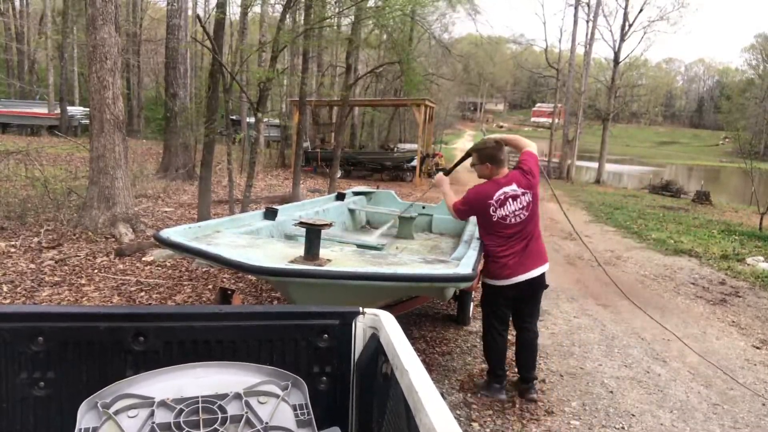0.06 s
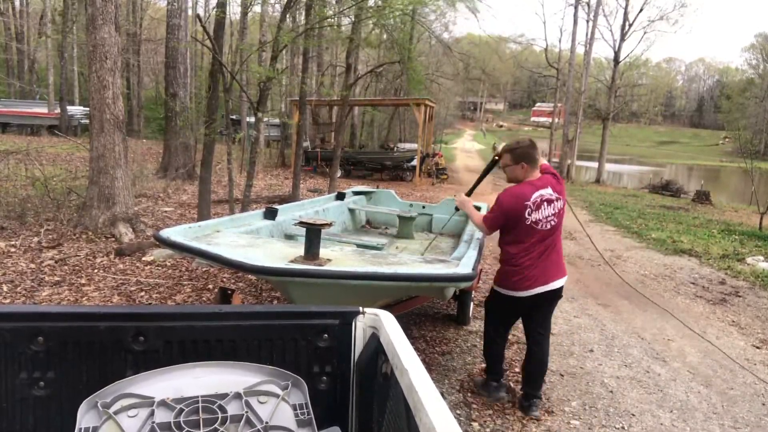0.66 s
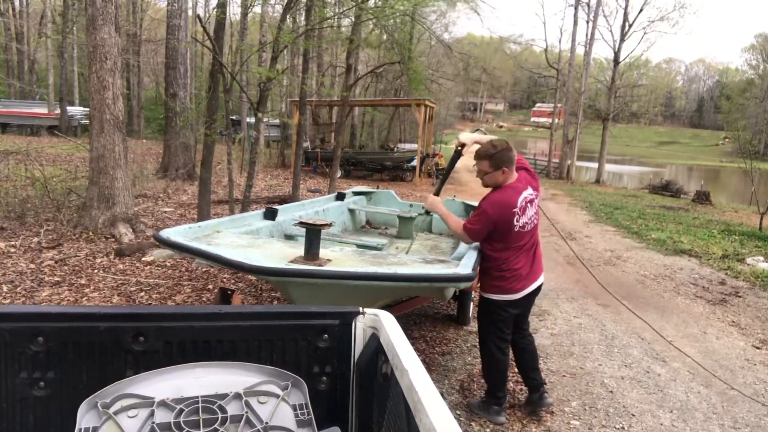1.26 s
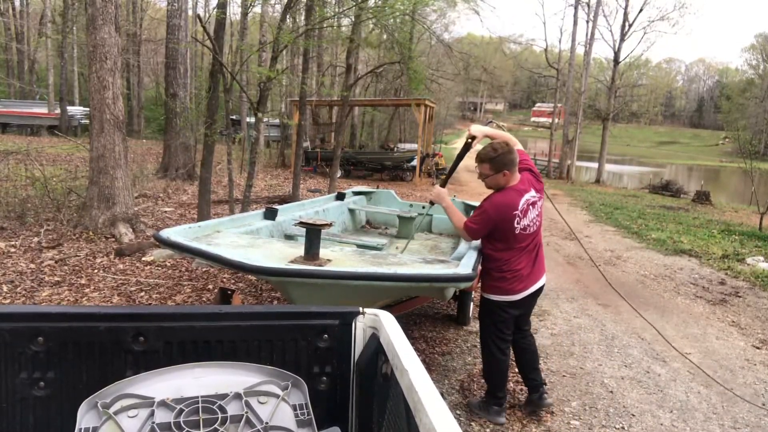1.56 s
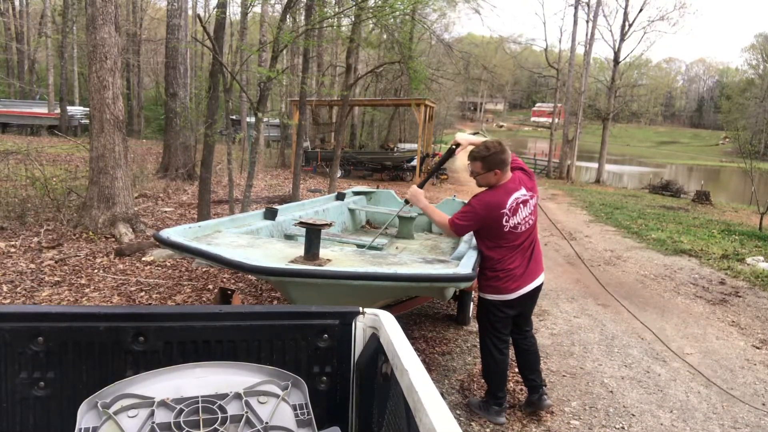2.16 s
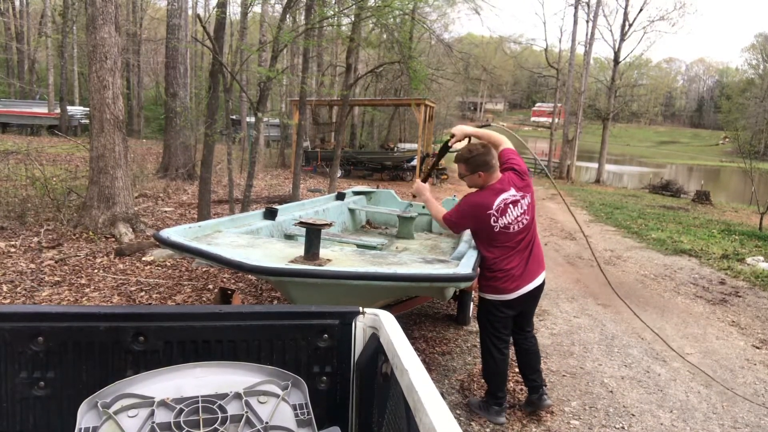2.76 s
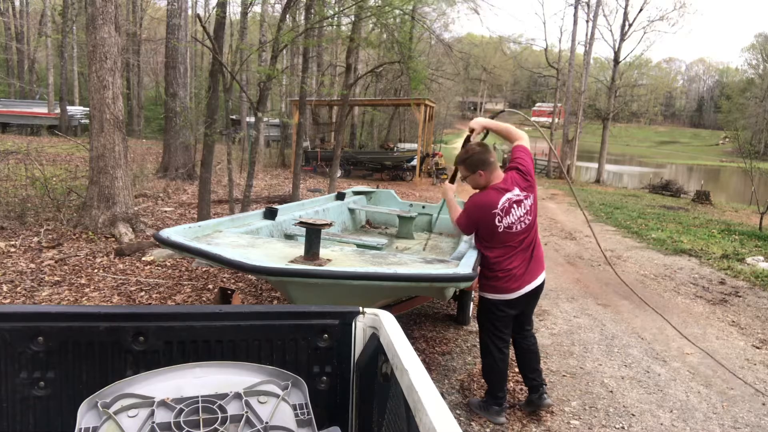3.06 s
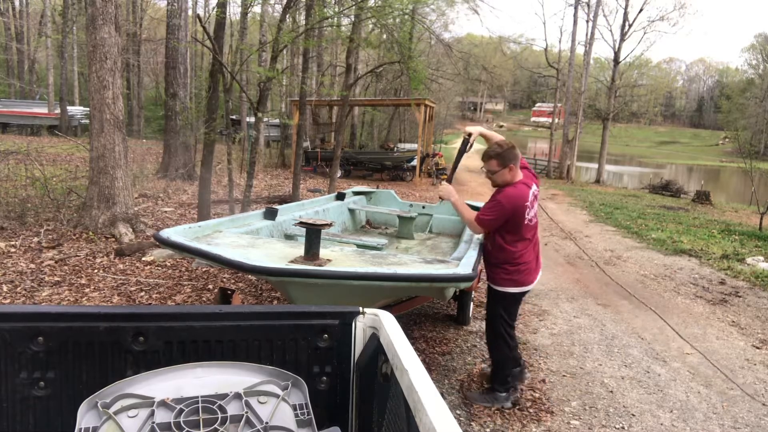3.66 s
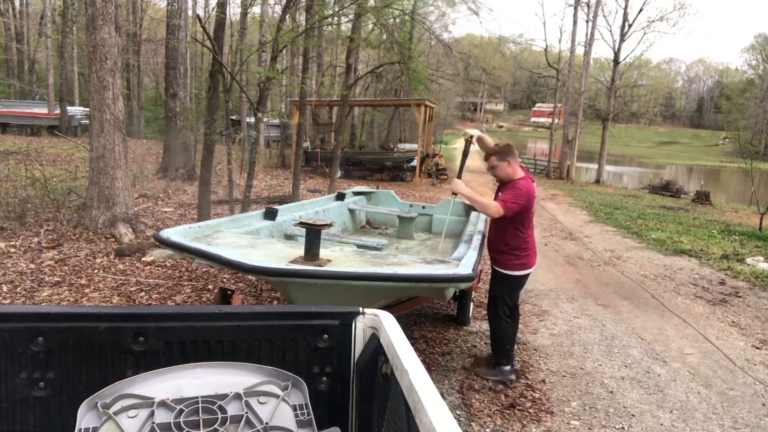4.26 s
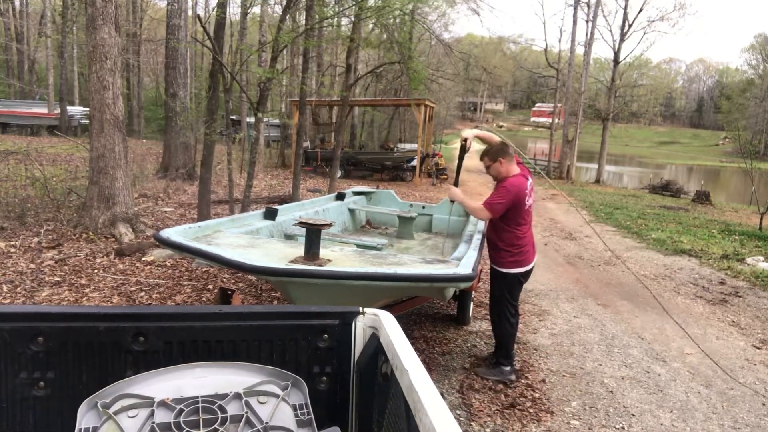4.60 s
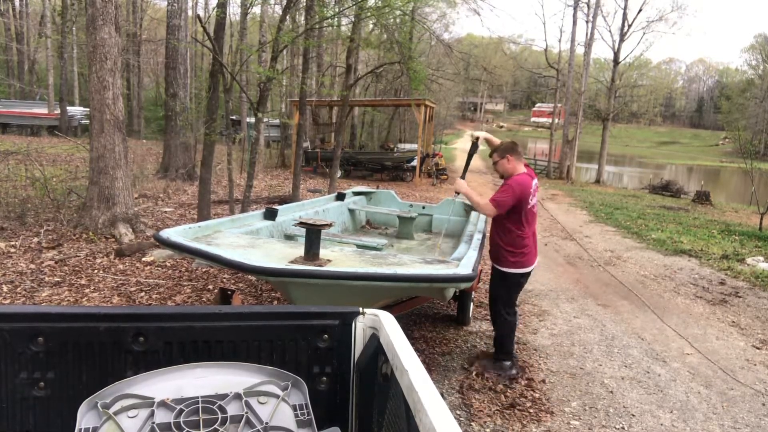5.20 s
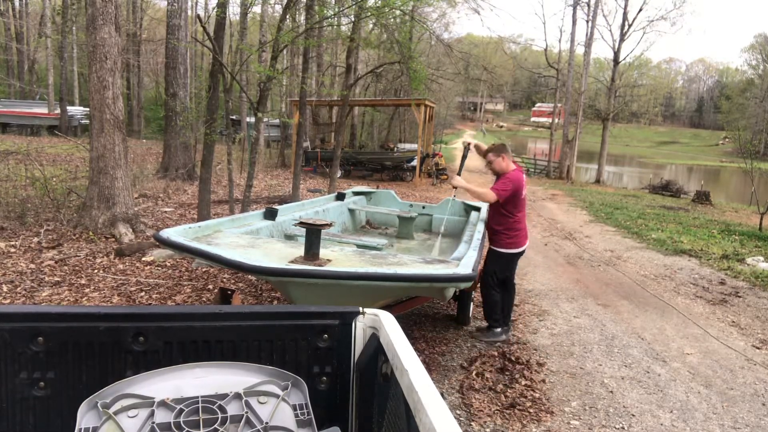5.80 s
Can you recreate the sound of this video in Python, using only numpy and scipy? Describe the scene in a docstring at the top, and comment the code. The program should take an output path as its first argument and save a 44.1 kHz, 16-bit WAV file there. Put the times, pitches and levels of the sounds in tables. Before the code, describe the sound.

An electric pressure washer runs outdoors with a buzzing hum and a thin high whine. At first the pump races unevenly and the nozzle spits air, while lumps of water slap a fiberglass boat. Then the pump slows slightly and holds steady, and the jet becomes a stronger, bright hiss with drops pattering on the hull. Light gusts of wind bump the single microphone.

```python
"""An electric pressure washer hums and hisses as it rinses a fiberglass boat outdoors.
Its pump knocks once per stroke, so fast that the knocks blend into a hum. With air in its water it
first races and spits, then slows and runs steadily at full pressure.
The jet is a hiss of tiny drops; heavier drops patter and drum on the hull.
Behind it all, light gusts of wind bump against the single microphone."""
import sys
import numpy as np
from scipy import signal
from scipy.fft import rfft, irfft, next_fast_len
from scipy.io import wavfile

SR = 44100
rng = np.random.default_rng(int(sys.argv[2]) if len(sys.argv) > 2 else 0)


def wav_record(signal):
    """Record a signal, one row per channel, as 16-bit PCM in the file named by sys.argv[1]."""
    frames = np.transpose(np.atleast_2d(signal))
    bounded = np.clip(frames, -1, 1)
    # unit amplitude maps onto the largest positive 16-bit level
    quanta = np.round(bounded * 32767).astype(np.int16)
    wavfile.write(sys.argv[1], SR, quanta)


N = 266364


# The tones in the hum: multiple of the stroke rate, relative level/dB running light, and working hard
HUM_TONES = [(1, -41, -33), (2, -12.5, -4), (3, -19, -11), (4, -18, -15), (5, -6, -7.3), (6, -6.5, -9),
             (7, -17, -11.8), (8, -9.5, -11.5), (9, -5, -8), (10, -9, -4), (11, -24, -29), (12, -20, -13.3),
             (13, -23, -13.3), (14, -27, -16), (15, -29, -11), (16, -26, -17.5), (17, -29, -29),
             (18, -28, -16), (19, -25, -29)]

def pump_hum(angle, pressure, phase_spread=1.0, waver_db=-0.13, waver_per_order_db=0.092, load_curve=1.7):
    """One knock per stroke makes a hum; hard work brings up its low tones and its buzzy top."""
    out, load = np.zeros(N), pressure ** load_curve
    for order, light_db, loaded_db in HUM_TONES:
        gain = (1 - load) * from_db(light_db) + load * from_db(loaded_db)
        waver = from_db((waver_db + waver_per_order_db * order) * drift(7.9))
        out += gain * waver * np.sin(order * angle + phase_spread * rng.standard_normal())
    return np.sqrt(2) * from_db(hum_db(pressure)) * out


# How many strokes the pump makes each second: t/s, f/Hz
STROKE_RATE = [(0.11, 112.7), (0.12, 111.5), (0.21, 115.8), (0.29, 111.5), (0.34, 115.7), (0.51, 113.4),
               (0.74, 113.9), (0.77, 111.9), (0.82, 113.1), (0.85, 110.0), (0.89, 110.9), (1.0, 109.9),
               (1.07, 116.2), (1.15, 116.2), (1.25, 112.2), (1.3, 113.5), (1.36, 110.8), (1.88, 109.0),
               (2.77, 109.2), (6.04, 109.0)]

def pump_angle(wander_hz=0.099, sway_hz=0.21, sway_rate_hz=5.6):
    """How far the pump has turned, one circle per stroke; its speed wanders and sways a little."""
    sway = np.sin(2 * np.pi * sway_rate_hz * np.arange(N) / SR + 1.56 * drift(0.98))
    speed = in_time(STROKE_RATE) + wander_hz * drift(4.87) + sway_hz * sway
    return 2 * np.pi * np.cumsum(speed) / SR


def hum_db(pressure, light_db=-30.5, loaded_db=-31, db_per_hz=0.98, light_speed_hz=113.5):
    """Running light, the hum gets louder with speed; working hard, it stays even."""
    racing_db = light_db + db_per_hz * (in_time(STROKE_RATE) - light_speed_hz)
    return by_pressure(pressure, racing_db, loaded_db)


# How hard the pump pushes the water: t/s, share of full pressure (0 to 1)
WATER_PRESSURE = [(0, 0.54), (.2, 0.16), (1.1, 0.12), (1.25, 0.1), (1.45, 0.74), (1.8, 1.0), (6.04, 0.99)]

def water_pressure():
    """The pressure sags while the pump draws air, then climbs to full."""
    return np.clip(in_time(WATER_PRESSURE), 0, 1)


# Gear and motor tones: multiple of the stroke rate (played rounded), level/dB running light, working hard
WHINE_TONES = [(23, -65, -61), (24, -56, -61.5), (30, -75, -55), (34, -75, -53), (35, -60, -59),
               (38, -63, -53), (40, -61, -48.5), (42, -46.5, -61.5), (43, -67, -58), (44, -66, -49),
               (45, -67, -57), (47, -62, -76), (48, -45, -73), (49, -42, -66), (54, -53, -46),
               (58, -50, -59), (61, -61, -48.5), (65.7, -56, -52), (68.5, -65, -47.5), (86, -70, -57),
               (103.6, -66, -47)]

def gear_whine(angle, pressure, flutter_db=2.5, slip=0.43):
    """Thin, high tones flutter as the gear teeth meet, and change level with the pressure."""
    out = np.zeros(N)
    for order, light_db, loaded_db in WHINE_TONES:
        phase = round(order) * angle + rng.uniform(0, 2 * np.pi) + slip * drift(11.5)
        level_db = by_pressure(pressure, light_db, loaded_db) + flutter_db * drift(16)
        out += from_db(level_db) * np.cos(phase)
    return np.sqrt(2) * out


# Moments when the pump's tones briefly drop in level: t/s, length/s, dip/dB
HUM_DIPS = [(0.478, 0.058, 5), (0.83, 0.1, 2), (0.942, 0.08, 10)]

def pump_dips_db(hold_s=0.013, fall_s=0.029):
    """The pump's tones dip briefly a few times early on, and during most bumps of wind."""
    dips = sum(db * burst_shape(start, length, 0.023, 0.018) for start, length, db in HUM_DIPS)
    bumps = sum(db * burst_shape(start, hold_s, fall_s=fall_s) for start, _, db in WIND_BUMPS)
    return dips + bumps


# The notes the pump's case rings at: f/Hz, width/Hz, level/dB running light, level/dB working hard
CASE_NOTES = [(2236, 56, -53, -49), (4850, 130, -51, -66), (5570, 85, -51, -45.5), (5844, 100, -52, -45),
              (7390, 130, -47.5, -50)]

def case_ring(angle, pressure, rub=1.0, flutter_db=2.5):
    """A tick in each stroke and steady rubbing make the pump's case ring."""
    ticks = np.diff(np.floor(angle / (2 * np.pi)), prepend=0)
    drive = rms_one(ticks) + rub * rng.standard_normal(N)
    out = np.zeros(N)
    for hz, width, light_db, loaded_db in CASE_NOTES:
        level_db = by_pressure(pressure, light_db, loaded_db) + flutter_db * drift(29)
        out += from_db(level_db) * rms_one(resonate(resonate(drive, hz, width), hz, 10 * width))
    return out


def case_song(angle, pressure, centre_hz=2298, width_hz=44, light_db=-38.5, loaded_db=-42.0):
    """A pump tone sings out when it nears the case's clearest note, less evenly while running light."""
    speed, out = np.gradient(angle) * SR / (2 * np.pi), np.zeros(N)
    nearest = round(centre_hz / speed.mean())
    for order in range(nearest - 2, nearest + 2):
        gain = 1 / (1 + (2 * (order * speed - centre_hz) / width_hz) ** 2)
        out += gain * np.cos(order * angle + 0.15 * drift(15))
    flutter_db = by_pressure(pressure, weak_db=3.5, full_db=2.0) * drift(17)
    return np.sqrt(2) * out * from_db(by_pressure(pressure, light_db, loaded_db) + flutter_db)


# The tone colour of the jet, weak and at full pressure: f/Hz, relative level/dB
WEAK_JET_COLOUR = [(1500, -3.5), (3000, -6.5), (3900, -7), (4600, -1.5), (6000, 0.5), (7300, -1),
                   (8300, -3), (11500, -2.5), (13500, -6), (15700, -10.5)]
FULL_JET_COLOUR = [(1500, -25), (3000, -14), (3700, -7), (4400, -1.5), (5200, -5), (5900, 2), (6900, -4),
                   (7500, -2.5), (8100, -4), (9500, -3), (11300, -2.5), (13200, -3.5), (14500, -8.5),
                   (15700, -7.5)]

def jet(angle, pressure, stroke_ripple=0.19, valve_ripple=0.16, flutter_db=0.28, growth_db_per_s=0.31):
    """Fine mist hisses, louder and brighter with pressure, and pulses with the strokes and valves."""
    weak = coloured(droplets(per_s=30000, spread_db=-1.0), WEAK_JET_COLOUR)
    full = coloured(droplets(per_s=30000, spread_db=1.5), FULL_JET_COLOUR)
    spray = np.sqrt(1 - pressure) * weak + np.sqrt(pressure) * full
    ripple = 1 + stroke_ripple * np.cos(angle) + valve_ripple * np.cos(4 * angle)
    level_db = by_pressure(pressure, weak_db=-35, full_db=-30.5) + growth_db_per_s * np.arange(N) / SR
    level_db += 0.31 * sweep_db()  # the hiss swells less than the splash
    return high_pass(spray, 1320) * ripple * from_db(level_db + flutter_db * drift(19))


# Air pockets leaving the nozzle: t/s, length/s, hiss level/dB, splash level/dB, sizzle level/dB
AIR_POCKETS = [(0.0, 0.017, -27, -48, -34), (.847, 0.013, -28, -41, -40), (0.881, 0.049, -26, -38.5, -30.5),
               (0.938, 0.1, -30.5, -37, -48), (1.531, 0.037, -21, -28.5, -40),
               (1.575, 0.016, -25, -32, -42), (1.61, .025, -27, -35, -45),
               (1.648, 0.027, -22.5, -31.5, -40), (1.973, 0.022, -20.5, -32, -38),
               (2.01, .055, -29, -39, -42)]
# The tone colour of their hiss: f/Hz, relative level/dB
SPIT_COLOUR = [(2000, 8), (3200, -37), (4500, -0.5), (5900, 6), (8200, 3.5), (10500, 5), (13200, 4),
               (15700, 9.5)]

def spits(sizzle_hz=13200, sizzle_width_hz=3000):
    """Each air pocket bursts out with a hiss and a high sizzle, and throws spray at the hull."""
    table = np.array(AIR_POCKETS)
    shapes = np.array([burst_shape(start, length) for start, length in table[:, :2]])
    hiss, splash, sizzle = from_db(table[:, 2:]).T @ shapes  # three loudness curves
    burst = hiss * high_pass(coloured(rng.standard_normal(N), SPIT_COLOUR), 1740)
    spray = splash * high_pass(coloured(droplets(per_s=9000, spread_db=2.5), HULL_COLOUR), 530)
    top = resonate(rng.standard_normal(N), sizzle_hz, sizzle_width_hz)
    top = resonate(top, sizzle_hz, 2 * sizzle_width_hz)
    return (burst + spray + sizzle * rms_one(top)) * from_db(drift(60))


# The tone colour of drops hitting the hull: f/Hz, relative level/dB
HULL_COLOUR = [(90, -15), (160, -5.5), (260, -4), (420, -11), (600, -1.5), (800, -5), (1050, -3.5),
               (1500, 2.5), (1900, 1), (2400, 5.5), (3000, -2), (4400, 3.5), (5800, 3), (9000, -14)]

def hull_splash(angle, pressure, ripple=0.084, flutter_db=1.3, top_hz=7000, drone_db=-48):
    """Heavier drops patter on the hull, harder with pressure, while its main panel drones evenly."""
    drops = droplets(per_s=9000, spread_db=0.7) * (1 + ripple * np.cos(angle))
    patter = high_pass(coloured(low_pass(drops, top_hz), HULL_COLOUR), 113)
    level_db = by_pressure(pressure, weak_db=-45.5, full_db=-37) + sweep_db() + flutter_db * drift(12)
    drone = rms_one(resonate(rng.standard_normal(N), hz=1030, width=170))
    return from_db(level_db) * patter + from_db(drone_db) * drone


# The jet sweeping across the hull: t/s, swell of the splash/dB
JET_SWEEPS = [(3.97, 3.5), (5.06, 1.5), (5.44, 3), (5.59, 2.5), (5.77, 4.5), (5.94, 3)]

def sweep_db(half_length_s=0.049):
    """Each sweep of the jet is a short swell with a lull on either side."""
    swell = np.zeros(N)
    for centre, db in JET_SWEEPS:
        away = ((np.arange(N) / SR - centre) / half_length_s) ** 2
        swell += db * (1 - away) * np.exp(-away / 2)
    return swell


# Lumps of water slapping the hull: t/s, length/s, level/dB
WATER_SLAPS = [(0.037, 0.069, -29), (0.3, .015, -33), (0.486, 0.079, -37), (.675, 0.014, -31.5),
               (0.859, 0.067, -33), (0.945, 0.094, -34), (2.397, 0.066, -35), (2.526, .015, -36),
               (4.335, 0.023, -36)]
# The notes the hull's panels ring at: f/Hz, width/Hz, relative level/dB
PANEL_NOTES = [(480, 137, -4), (668, 155, 1.5), (804, 76, -4), (944, 130, -1.5), (1142, 91, -4),
               (1380, 190, -1.5)]

def hull_slaps():
    """Lumps of water set the fiberglass panels drumming."""
    force = sum(from_db(db) * burst_shape(start, length) for start, length, db in WATER_SLAPS)
    drops = droplets(per_s=4300, spread_db=4.0)
    panels = sum((-1) ** k * from_db(db) * resonate(drops, hz, width)
                 for k, (hz, width, db) in enumerate(PANEL_NOTES))
    return force * rms_one(low_pass(panels, 1800))


def boat_echoes(x, strength=0.13, count=10):
    """Very quick echoes inside the open hull colour the spray."""
    out = x.copy()
    for lag in (rng.uniform(0.001, 0.007, count) * SR).astype(int):
        out[lag:] += strength * rng.choice([-1, 1]) * x[:-lag]
    return out / np.sqrt(1 + count * strength ** 2)


# Gusts on the microphone: t/s, length/s, level/dB
WIND_GUSTS = [(0.0, 0.51, -44), (.65, 0.032, -41), (0.796, 0.24, -38.5), (1.245, .04, -39), (1.4, .02, -44),
              (2.33, 0.41, -43), (2.8, .23, -44.5), (4.13, .05, -45), (4.31, 0.25, -42.5),
              (4.95, 0.087, -47), (5.3, .13, -44), (5.68, .1, -48)]
# Single bumps of wind: t/s, level/dB, dip of the pump's tones/dB
WIND_BUMPS = [(0.038, -36, 14), (.073, -26, 4), (.25, -36, 2.5), (.42, -39, -1), (.817, -29, 1.5),
              (0.956, -36, 3), (1.024, -36, -1), (1.841, -36, 0), (2.347, -31, 3), (2.398, -33, 8),
              (2.445, -29, 7), (2.53, -35, 4.5), (2.68, -34, 1), (4.335, -29, 2), (4.44, -37, 0.5),
              (4.49, -40, 0)]
# The tone colour of the wind: f/Hz, relative level/dB
WIND_COLOUR = [(30, -43), (80, -34), (115, -13), (160, 0), (240, 5.5), (420, -0.5), (700, -4), (1050, -9.5),
               (1400, -11.5), (2200, -27), (5000, -49)]

def wind(breeze_db=-53.5, lumpy_db=6.5, thump_hz=230, thump_width_hz=130):
    """Air swirls at the microphone in uneven gusts; each bump is a low thump with a puff of noise."""
    strength = from_db(breeze_db)
    for start, length, db in WIND_GUSTS:
        gust = from_db(db) * burst_shape(start, length, rise_s=0.015, fall_s=0.073)
        strength = np.hypot(strength, gust)
    strength *= from_db(lumpy_db * np.tanh(drift(27)))
    pushes = np.zeros(N)
    for start, db, _ in WIND_BUMPS:
        puff = from_db(db) * burst_shape(start, 0.0084, rise_s=0.0029, fall_s=0.0065)
        strength = np.hypot(strength, puff)
        pushes[round(start * SR)] = from_db(db + 4)
    thumps = low_pass(resonate(pushes + 1e-18, thump_hz, thump_width_hz), 700) / 2
    return high_pass(strength * coloured(rng.standard_normal(N), WIND_COLOUR) + thumps, 130)


def outdoor_air(level_db=-74):
    """A very faint, low rush of open air."""
    colour = [(20, 1), (80, 0), (300, -12), (3000, -26)]  # f/Hz, relative level/dB
    return from_db(level_db) * coloured(rng.standard_normal(N), colour)


def by_pressure(pressure, weak_db, full_db):
    """Slide from the weak value to the full value as pressure builds."""
    return weak_db + (full_db - weak_db) * pressure


def droplets(per_s, spread_db):
    """Random tiny hits of uneven size."""
    sizes = from_db(spread_db * np.minimum(rng.exponential(1, N), 4)) * rng.standard_normal(N)
    return rms_one(sizes * (rng.random(N) < per_s / SR))


def burst_shape(start, length, rise_s=0.0048, fall_s=0.019):
    """Rise quickly, hold, then fade."""
    age = np.arange(N) / SR - start
    return np.clip(age / rise_s, 0, 1) * np.exp(-np.clip(age - length, 0, 1) / fall_s)


def drift(rate):
    """A smooth random wobble of size about 1, changing about rate times a second."""
    r = np.exp(-80 * np.pi * rate / SR)
    noise = rng.standard_normal(N // 40 + 2002)  # one value every 40 samples
    slow = signal.lfilter([1], [1, -2 * r, r * r], noise)[2000:]
    return np.interp(np.arange(N) / 40, np.arange(len(slow)), rms_one(slow))


def coloured(x, spectrum):
    """Give a sound a tone colour, at an average power of 1."""
    hz, db = np.transpose(spectrum)
    size = next_fast_len(N)
    log_hz = np.log(np.fft.rfftfreq(size, 1 / SR) + 1)
    gain = from_db(np.interp(log_hz, np.log(hz), db))
    return rms_one(irfft(rfft(x, size) * gain, size)[:N])


def resonate(x, hz, width):
    """Ring at hz; a smaller width rings longer."""
    r = np.exp(-np.pi * width / SR)
    return signal.lfilter([1, 0, -1], [1, -2 * r * np.cos(2 * np.pi * hz / SR), r * r], x)


def high_pass(x, hz):
    """Cut away what lies below hz."""
    return signal.sosfilt(signal.butter(4, hz, "high", fs=SR, output="sos"), x)


def low_pass(x, hz):
    """Soften what lies above hz."""
    return signal.sosfilt(signal.butter(2, hz, fs=SR, output="sos"), x)


def in_time(rows):
    """Join (time, value) points with straight lines."""
    return np.interp(np.arange(N) / SR, *np.transpose(rows))


def from_db(db):
    """Turn decibels into a multiplier."""
    return 10 ** (np.asarray(db) / 20)


def rms_one(x):
    """Scale to an average power of 1."""
    return x / np.sqrt(np.mean(x ** 2) + 1e-20)


def scene():
    """Pump, water and wind reach one microphone, so left and right are the same."""
    angle, pressure = pump_angle(), water_pressure()
    tones = (pump_hum(angle, pressure) + gear_whine(angle, pressure)) * from_db(-pump_dips_db())
    machine = tones + case_ring(angle, pressure) + case_song(angle, pressure)
    water = boat_echoes(jet(angle, pressure) + spits()) + hull_splash(angle, pressure) + hull_slaps()
    background = outdoor_air() + wind()
    return np.tile(machine + water + background, (2, 1))


def record(dry, cutoff_hz=15720):
    """The very highest treble is cut off sharply."""
    treble_cut = signal.firwin(801, cutoff_hz, fs=SR, window=("kaiser", 8))
    return signal.fftconvolve(dry, treble_cut[None], "same", axes=1)


dry = scene()
out = record(dry)
wav_record(out)
```